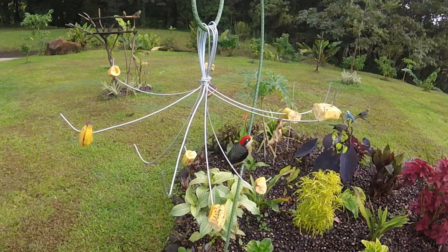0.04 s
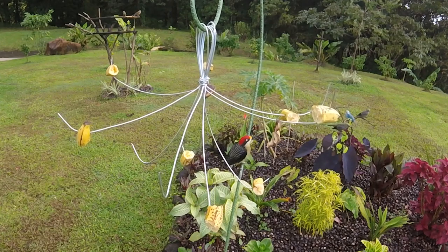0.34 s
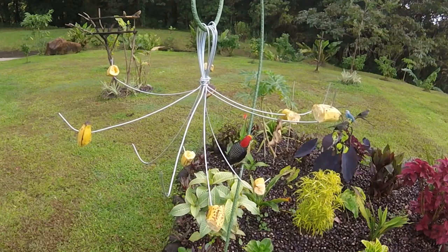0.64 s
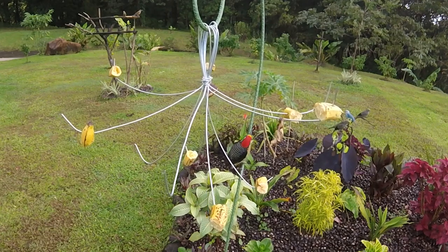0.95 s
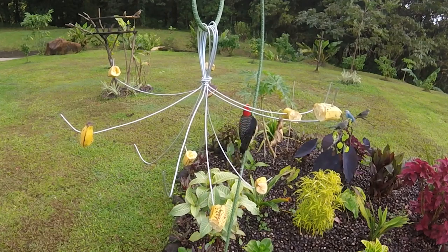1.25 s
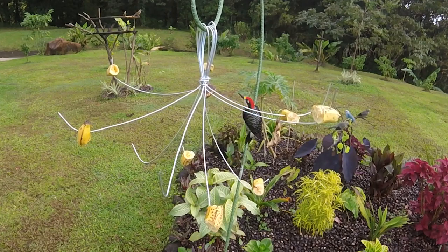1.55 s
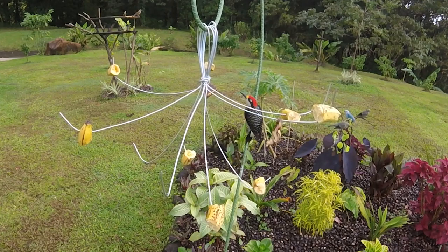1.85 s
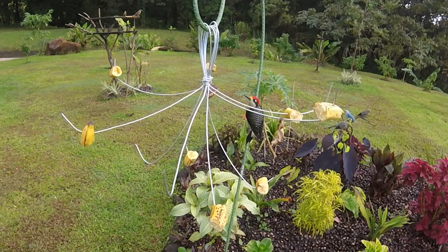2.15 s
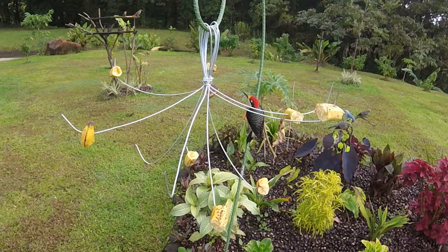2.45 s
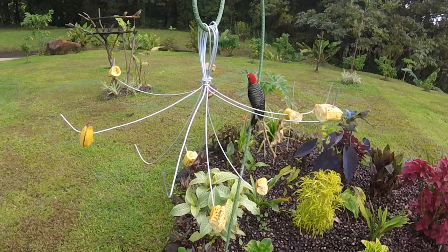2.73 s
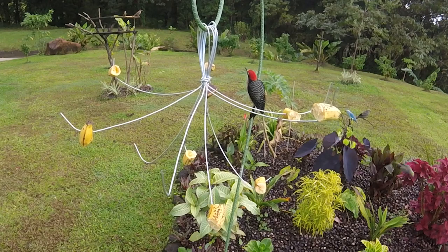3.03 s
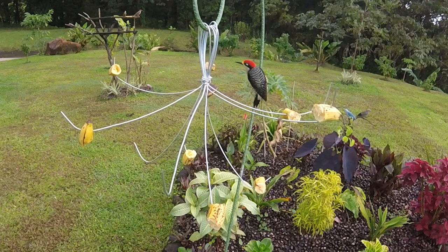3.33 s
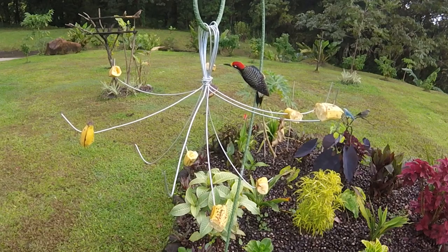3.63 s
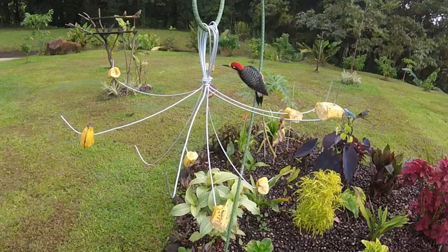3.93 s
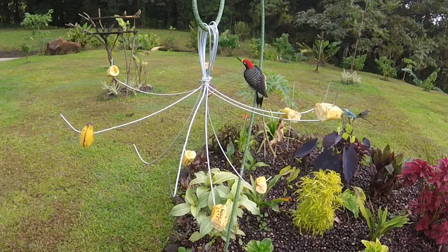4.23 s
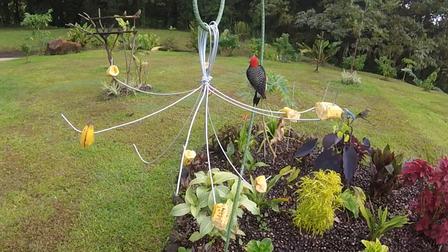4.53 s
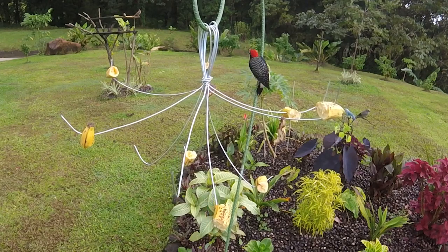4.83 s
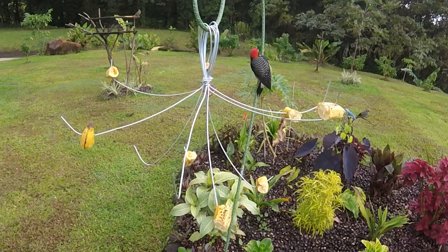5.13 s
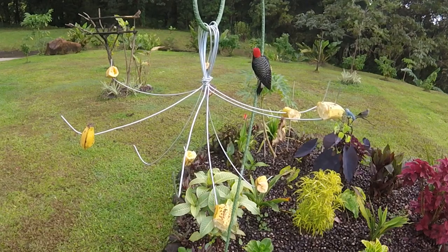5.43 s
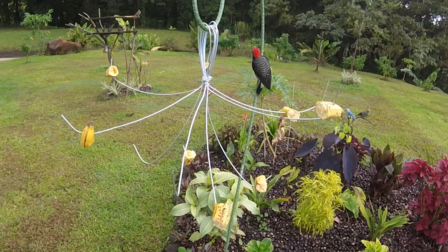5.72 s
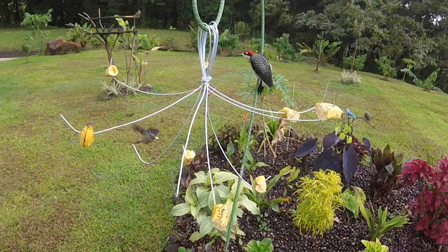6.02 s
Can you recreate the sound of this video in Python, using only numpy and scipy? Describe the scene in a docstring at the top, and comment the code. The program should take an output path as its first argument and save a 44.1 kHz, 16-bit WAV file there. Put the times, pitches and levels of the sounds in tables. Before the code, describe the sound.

A bird gives five short nasal calls in a quiet garden, the first three spaced out and the last two close together, with a few soft clucks in between. Another, fainter bird chirps midway and slides up a thin whistle just before the final pair. Uneven wind buffets the microphone with a low rumble, strongest early on, over a steady soft wash of outdoor air.

```python
"""A wet garden with a bird feeder. From the start, gusts rumble on the microphone over quiet outdoor air
and the recorder's hiss and faint whine. After a second a bird clucks, gives a soft double note and begins
its short, nasal calls, harmonics of the syrinx that arch in pitch and resonate in the throat. Near 3 s
another bird chirps among more clucks; from 4.2 s it draws out a thin rising whistle. Two quick nasal
calls and a last gust close the scene. The garden faintly echoes both birds."""
import sys
import numpy as np
from scipy import signal
from scipy.fft import rfft, irfft, next_fast_len
from scipy.io import wavfile
from scipy.ndimage import uniform_filter1d

SR = 44100
rng = np.random.default_rng(int(sys.argv[2]) if len(sys.argv) > 2 else 0)


def waveform_to_disk(signal):
    """Save audio, clipped to [-1, 1], as 16-bit WAV at the path in sys.argv[1]."""
    frames = np.transpose(np.atleast_2d(signal))
    scaled = np.clip(frames, -1, 1) * 32767
    samples = np.round(scaled).astype(np.int16)
    wavfile.write(sys.argv[1], SR, samples)


N = 267775
T = np.arange(N) / SR

# noise spectra of outdoor air, deep buffeting, flutter and small eddies: f/Hz, relative density/dB
AIR_SPECTRUM = [(30, 0.5), (150, 2.5), (270, -1.5), (420, -5), (600, -7), (870, -5), (1300, -13),
                (2200, -16.5), (4000, -21.5), (6200, -25), (7600, -29), (9400, -33), (12000, -41.5),
                (15000, -60)]
BUFFET_SPECTRUM = [(8, -6.5), (16, 7.5), (25, 6), (32, -4), (45, -8.5), (55, -12.5), (75, -36)]
FLUTTER_SPECTRUM = [(42, -5), (60, 1.5), (80, -8), (105, -11), (150, -21), (200, -37), (270, -41),
                    (400, -72)]
WHIRL_SPECTRUM = [(100, -25), (135, -0.5), (160, 1), (195, -22.5), (260, -30), (380, -60)]
# gusts on the microphone: peak t/s, level/dB, 1/e fall t/s, flutter level against buffeting/dB
WIND_GUSTS = [(.165, -28, 0.031, -16), (0.308, -29, 0.07, -4), (.56, -31, 0.12, -6),
              (0.759, -29, 0.031, -9), (.89, -35.5, 0.22, -3.5), (1.51, -27, 0.059, -14),
              (1.674, -18.5, 0.084, -6), (1.87, -36, .085, 6), (2.0, -33.5, 0.2, -18.5),
              (2.62, -39.5, 0.37, -19), (3.14, -36, 0.11, -19.5), (4.13, -33.5, 0.041, -17),
              (4.215, -40.5, 0.061, 3), (5.979, -27.5, 0.084, -18.5)]
# soft clucks: onset t/s, pitch f/Hz, level/dB, 60 dB decay at that pitch t/s
CLUCK_EVENTS = [(1.124, 600, -43, 0.039), (3.025, 760, -38, 0.095), (3.183, 753, -48.5, 0.12),
                (3.298, 827, -42, 0.12), (3.388, 760, -41, 0.084)]
# throat modes in a cluck: f/pitch, gain/dB
THROAT_MODES = [(0.802, -10), (0.998, 4.5), (1.35, -5), (2.65, -7.5)]
# reflections off the ground and near objects: delay t/s, gain/dB
REFLECTIONS = [(.0072, -39), (.024, -18.5), (.04, -28.5), (.058, -41)]
# syllables of the double note: onset t/s, length t/s, starting f/Hz, rise/starting f, source level/dB
NOTE_SYLLABLES = [(1.198, 0.041, 302.5, .19, -36), (1.23, .042, 312, 0.18, -37)]
# throat response with the beak nearly shut: f/Hz, gain/dB
SHUT_RESPONSE = [(350, -33), (560, -6.5), (670, -12.5), (800, -8.5), (950, -2), (1080, -5.5), (1300, -34),
                 (1800, -45), (2500, -47)]
# nasal calls: apex t/s, apex f/Hz, level/dB, half length t/s, roughness (0-1),
# fall per harmonic/dB, sizzle level/dB
NASAL_CALLS = [(1.487, 455.3, -18.5, .025, 0.4, 3.5, -72), (2.381, 444, -20, 0.024, 0.3, 3, -74),
               (3.23, 459.6, -18.5, 0.025, 0.33, 4, -70), (5.161, 479.2, -18, .022, 0.42, 4.5, -70),
               (5.3205, 509.6, -16, 0.026, 0.31, 5.5, -63)]
# resonances of the caller's throat at a middling pitch: f/Hz, bandwidth/Hz, gain/dB
THROAT_FORMANTS = [(942, 145, 5.5), (1350, 140, -0.5), (1643, 600, -8), (2370, 530, -12.5), (2607, 63, -9)]
# faint high sizzle on the calls: f/Hz, relative density/dB
SIZZLE_SPECTRUM = [(5000, -30.5), (8000, -16), (10300, -4), (11200, 6.5), (12300, -4.5), (13200, -29.5),
                   (15000, -37)]
# paired chirps: onset t/s, length t/s, starting f/Hz, rise/starting f, source level/dB
CHIRP_NOTES = [(2.876, .03, 1930, .07, -62), (2.914, .022, 1960, .05, -65), (3.366, 0.041, 2046, 0.26, -51),
               (3.405, 0.017, 2100, .08, -53)]
# response of the whistler's throat and beak: f/Hz, gain/dB
BEAK_RESPONSE = [(1300, -39), (1900, -36), (2100, -8.5), (2320, 3), (2450, -7), (2900, -12), (3700, -10.5),
                 (4200, -17.5), (4700, -26), (5300, -4.5), (5800, -8), (6800, -11.5), (7250, -20),
                 (8000, -48)]
# electronic hiss: f/Hz, relative density/dB
HISS_SPECTRUM = [(9300, -37.5), (9600, 1.5), (10500, -4), (12100, -7), (12500, -20.5), (14500, -33.5)]
# electronic whine: f/Hz, level/dB
WHINE_TONES = [(5768, -90), (9590, -100), (9650, -89), (9710, -91)]


def from_db(db):
    """Amplitude ratio of a level in decibels."""
    return 10 ** (np.asarray(db) / 20)


def rms_one(x):
    """Normalisation to unit rms."""
    return x / np.sqrt(np.mean(x ** 2) + 1e-20)


def gain_at(spectrum, hz):
    """Frequency response, interpolated in decibels over log frequency."""
    f, db = np.transpose(spectrum)
    return from_db(np.interp(np.log(hz + 1e-3), np.log(f), db, right=-120))


def noise(spectrum):
    """Spectral shaping of white noise, at unit rms."""
    size = next_fast_len(N)
    hz = np.arange(size // 2 + 1) * SR / size
    return rms_one(irfft(rfft(rng.standard_normal(size)) * gain_at(spectrum, hz), size)[:N])


def drift(rate_hz):
    """Random modulation: low-passed noise of unit rms."""
    return rms_one(signal.sosfilt(signal.butter(2, rate_hz, fs=SR, output="sos"), rng.standard_normal(N)))


def outdoor_air(db=-55.5):
    """Stationary broadband noise: the far wash of outdoor air."""
    return from_db(db) * noise(AIR_SPECTRUM)


def gust(t, fall_s, rise_share=0.89):
    """Asymmetric Gaussian envelope: a gust builds a little faster than it dies."""
    return np.exp(-(t / np.where(t < 0, rise_share * fall_s, fall_s)) ** 2)


def eddies(spectrum, span_s):
    """Turbulence divided by its running rms, so that the wind's envelope sets its level."""
    x = noise(spectrum)
    power = signal.fftconvolve(x ** 2, np.hanning(int(span_s * SR)), "same")
    return rms_one(x / np.sqrt(power + 1e-9))


def wind(flutter_lag_s=0.016, breeze_db=-48.5, breeze_flutter_db=-56):
    """Turbulent pressure on the microphone: gusts add in power, flutter follows and sheds small eddies."""
    buffet_power, flutter_power = from_db(breeze_db) ** 2, from_db(breeze_flutter_db) ** 2
    for s, db, fall_s, flutter_db in WIND_GUSTS:
        buffet_power += (from_db(db) * gust(T - s, fall_s)) ** 2
        flutter_power += (from_db(db + flutter_db) * gust(T - s - flutter_lag_s, fall_s)) ** 2
    buffet, flutter = np.sqrt(buffet_power), np.sqrt(flutter_power)
    whirl = from_db(-44) * (flutter / from_db(-27.5)) ** 3.3   # 3.3 dB more per dB of flutter
    return (buffet * eddies(BUFFET_SPECTRUM, span_s=0.27)
            + flutter * eddies(FLUTTER_SPECTRUM, span_s=0.36)
            + whirl * eddies(WHIRL_SPECTRUM, span_s=0.059))


def clucks(grain=0.59, swell_s=0.005):
    """Damped free vibration: an uneven pop of air rings the throat, and the high modes die first."""
    out, uneven = np.zeros(N), drift(150)
    for s, hz, db, t60 in CLUCK_EVENTS:
        on = (T > s) & (T < s + 2 * t60)
        t = T[on] - s
        ringing = sum(from_db(mode_db - 60 * ratio * t / t60) * np.sin(2 * np.pi * ratio * hz * t)
                      for ratio, mode_db in THROAT_MODES)
        out[on] += from_db(db) * (1 - np.exp(-t / swell_s)) * ringing * (1 + grain * uneven[on])
    return out


def garden_echo(x, t60=0.16, band_hz=(1100, 3500), build_s=0.026):
    """Reflection and scattering: a few weak echoes, and a brief mid-range tail from leaves and trees."""
    t = T[:SR // 2]
    scatter = rng.standard_normal(len(t)) * from_db(-60 * t / t60) * (1 - np.exp(-(t / build_s) ** 2))
    foliage = signal.butter(1, band_hz, "band", fs=SR, output="sos")
    response = from_db(-18) * signal.sosfilt(foliage, scatter / np.linalg.norm(scatter))
    for delay_s, db in REFLECTIONS:
        response[round(delay_s * SR)] += from_db(db)
    return x + signal.fftconvolve(x, response)[:N]


def voice(pitch, response, harmonics):
    """Source and filter: the throat weights each harmonic of the syrinx at its momentary frequency."""
    phase = 2 * np.pi * np.cumsum(pitch) / SR
    partials = (gain_at(response, k * pitch) * np.sin(k * phase) for k in range(1, harmonics + 1))
    return np.sqrt(2) * sum(partials)


def rising_notes(notes, response, harmonics, jitter, jitter_hz, curve=1.93):
    """Frequency modulation: each note swells and fades as its unsteady pitch bends up ever faster."""
    out, wobble = np.zeros(N), drift(jitter_hz)
    for s, length_s, hz, rise, db in notes:
        on = (T > s) & (T < s + length_s)
        along = (T[on] - s) / length_s
        pitch = hz * (1 + rise * along ** curve) * (1 + jitter * wobble[on])
        out[on] += from_db(db) * np.sin(np.pi * along) * voice(pitch, response, harmonics)
    return out


def double_note():
    """Filtering by a throat with the beak nearly shut muffles two low, slightly rough syllables."""
    return rising_notes(NOTE_SYLLABLES, SHUT_RESPONSE, harmonics=6, jitter=0.045, jitter_hz=250)


def throat(source, stretch, low_hz=650, high_hz=2800):
    """Parallel resonators, tuned up as the throat tightens; little radiates below or above them."""
    out = 0
    for k, (hz, width_hz, db) in enumerate(THROAT_FORMANTS):
        resonator = signal.iirpeak(hz * stretch, hz / width_hz, fs=SR)
        out = out + (-1) ** k * from_db(db) * signal.lfilter(*resonator, source)
    out = signal.sosfilt(signal.butter(6, low_hz, "high", fs=SR, output="sos"), out)
    return signal.sosfilt(signal.cheby1(9, 0.5, high_hz, fs=SR, output="sos"), out)


def nasal_calls(sag=0.42, edge_db=19, jitter=0.08, rasp_hz=1300, lag_s=0.0034, middling_hz=454.7):
    """Pressure-driven oscillation: one push of air arches pitch and loudness; the edges are hoarser."""
    out, wobble, sizzle = np.zeros(N), drift(450), noise(SIZZLE_SPECTRUM)
    turbulence = signal.sosfilt(signal.butter(1, rasp_hz, fs=SR, output="sos"), rng.standard_normal(N))
    for s, top_hz, db, half_s, rough, step_db, sizzle_db in NASAL_CALLS:
        on = np.abs(T - s) < 2 * half_s
        t = T[on] - s
        bend = (np.abs(t) / half_s) ** 2.7
        arch = 1.3 * bend / (0.3 + bend)   # 0 at the apex, 1 half a length away
        pitch = top_hz * np.exp(-sag * arch) * (1 + jitter * rough * wobble[on])
        phase = 2 * np.pi * np.cumsum(pitch) / SR
        overtones = sum(from_db(-step_db * (k - 2.5)) * np.cos(k * phase) for k in range(2, 10))
        pulses = from_db(-26) * np.cos(phase) + overtones   # the fundamental is almost absent
        # turbulence escapes each time the syrinx opens
        rasp = 2 * rough * (1 + 2 * arch) * (1 + np.cos(phase)) * turbulence[on]
        call = throat(pulses + rasp, stretch=top_hz / middling_hz)
        call /= np.sqrt(uniform_filter1d(call ** 2, size=400) + 1e-9)   # the push alone shapes the level
        off_peak = np.abs(t - lag_s) / half_s
        push = from_db(-edge_db * off_peak ** 2) / (1 + off_peak ** 20)
        out[on] += push * (from_db(db) * call + from_db(sizzle_db) * (1 - arch / 2) * sizzle[on])
    return out


def chirps():
    """Rapid frequency jitter makes the whistler's short upward chirps scratchy."""
    return rising_notes(CHIRP_NOTES, BEAK_RESPONSE, harmonics=4, jitter=0.021, jitter_hz=600)


def whistle(start_s=4.23, break_s=4.803, top_s=4.995, end_s=5.16, start_hz=1175, top_hz=2397,
            climb_s=0.475, jump_s=0.0071, swell_s=0.26, release_s=0.07):
    """Swept resonance: the harmonics of a swelling glide stand out as they cross the beak's peaks."""
    on = (T > start_s) & (T < end_s)
    t = T[on]
    age = t - start_s
    climb = top_hz - (top_hz - start_hz) * np.exp(-age / climb_s)
    arch = top_hz - 4500 * (t - top_s) ** 2
    jump = (1 + np.tanh((t - break_s) / jump_s)) / 2   # the climb breaks upwards into the shallow arch
    waver, scratch = 0.0036 * drift(25)[on], 0.0019 * drift(600)[on]
    pitch = (climb + jump * (arch - climb)) * (1 + waver + scratch)
    flicker_db = 1.5 * drift(35)[on]
    source_db = -53.5 - 24 * np.exp(-age / swell_s) + flicker_db
    release = np.tanh((end_s - t) / release_s)
    out = np.zeros(N)
    out[on] = from_db(source_db) * release * voice(pitch, BEAK_RESPONSE, harmonics=4)
    return out


def scene():
    """Superposition of the echoing birds, the outdoor air and the wind, in one channel."""
    caller = nasal_calls() + clucks() + double_note()
    whistler = chirps() + whistle()
    return (garden_echo(caller + whistler) + outdoor_air() + wind())[None]


def record(dry, hiss_db=-76, cutoff_hz=15000):
    """Self-noise and band limiting: the electronics add a thin whine and a high hiss, and cut the top."""
    whine = np.sqrt(2) * sum(from_db(db) * np.sin(2 * np.pi * hz * T) for hz, db in WHINE_TONES)
    hiss = from_db(hiss_db) * noise(HISS_SPECTRUM)
    return signal.sosfilt(signal.cheby2(12, 70, cutoff_hz, fs=SR, output="sos"), dry + whine + hiss)


dry = scene()
out = record(dry)
waveform_to_disk(out)
```